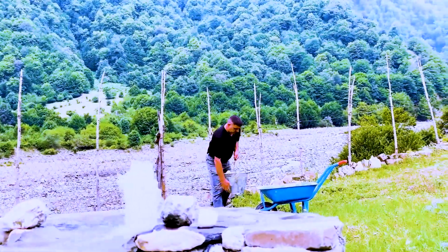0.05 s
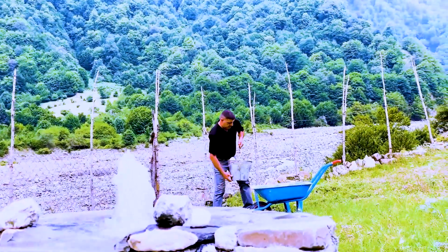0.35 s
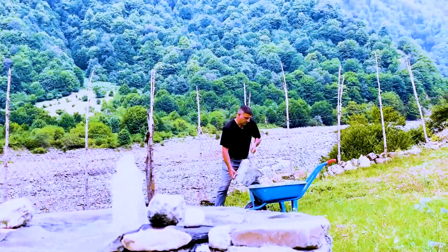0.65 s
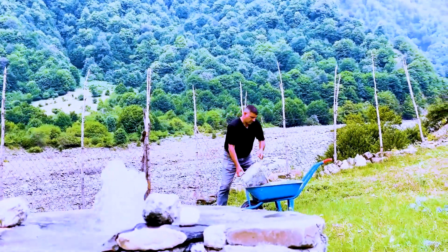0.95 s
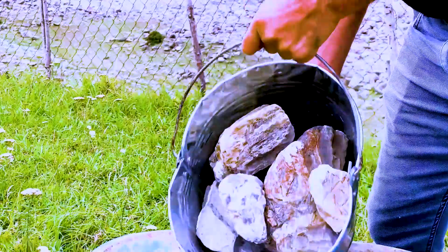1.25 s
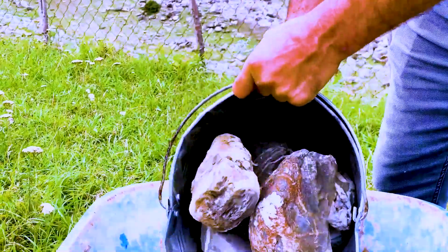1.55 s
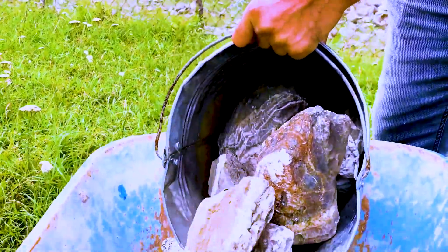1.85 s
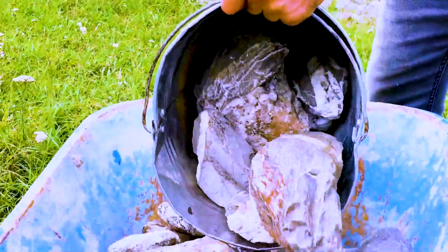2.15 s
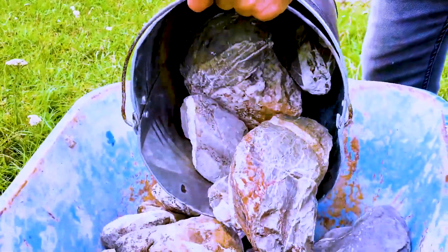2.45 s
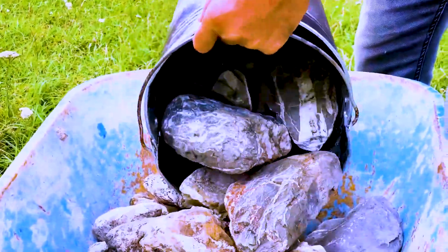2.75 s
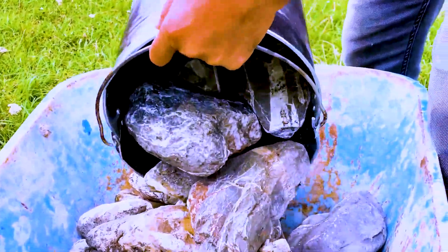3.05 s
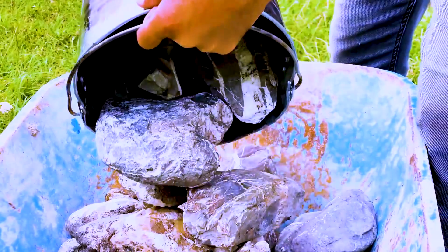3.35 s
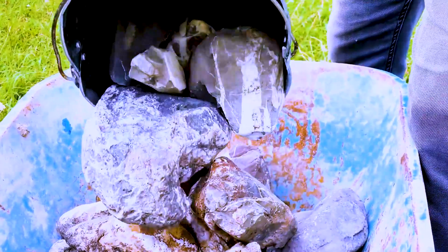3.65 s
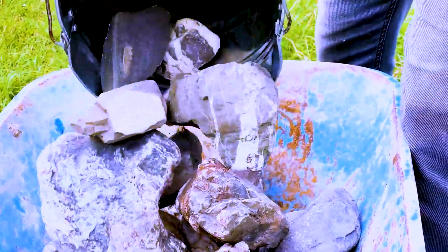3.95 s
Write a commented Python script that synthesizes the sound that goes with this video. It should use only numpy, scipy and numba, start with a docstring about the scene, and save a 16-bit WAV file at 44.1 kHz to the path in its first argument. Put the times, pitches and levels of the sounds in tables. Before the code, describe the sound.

Rocks knock lightly in a metal bucket at first, then tumble with loud, hollow clanks close by from about 1.5 to 2.3 seconds. They scrape out into a wheelbarrow in three gritty slides at about 2.5, 3 and 3.5 seconds, ending on a hard knock. Outdoors behind them, faint falling bird chirps recur roughly every second, with a brief whistle and trill, thin insect hiss and soft air rumble.

```python
"""Rocks tumble from a metal bucket into a wheelbarrow, close by and outdoors.
Their impacts excite the damped modes of the bucket; then they slide out in three pushes, driving
the wall by stick-slip friction while grit hisses under them. Birds chirp, whistle and trill in
frequency-modulated tones, an insect pulses, and air stirs at the microphone.
The recorder's limiter ducks after the hard knocks."""
import sys
import numpy as np
from scipy import signal
from scipy.fft import rfft, irfft
from scipy.io import wavfile
from scipy.ndimage import uniform_filter1d, minimum_filter1d
from numba import njit

SR = 44100
rng = np.random.default_rng(int(sys.argv[2]) if len(sys.argv) > 2 else 0)


def master_out(mix):
    """Clip the mix to full scale and print it as 16-bit PCM to the path in sys.argv[1]."""
    frames = np.transpose(np.atleast_2d(mix))
    ceiling = np.clip(frames, -1, 1)
    pcm = np.round(ceiling * 32767).astype(np.int16)
    wavfile.write(sys.argv[1], SR, pcm)


N = 176400
TIME = np.arange(N) / SR


def undb(db):
    """Amplitude ratio of a level in decibels."""
    return 10 ** (np.asarray(db) / 20)


def unit(x):
    """Normalisation to rms 1."""
    return x / np.sqrt(np.mean(x ** 2) + 1e-18)


def shape(x, gain):
    """Linear filtering: the spectrum is multiplied by gain(f)."""
    n = x.shape[-1]
    return irfft(rfft(x) * gain(np.maximum(np.fft.rfftfreq(n, 1 / SR), 1)), n)


def curve(f, points):
    """Interpolation of (f/Hz, value) points over log frequency."""
    hz, values = np.array(points, float).T
    return np.interp(np.log(f), np.log(hz), values)


def colour(x, points):
    """Zero-phase filtering by (f/Hz, gain/dB) points."""
    return shape(x, lambda f: undb(curve(f, points)))


def walk(rate):
    """Smoothed Gaussian noise, drawn `rate` times a second."""
    k = int(SR / rate)
    steps = np.repeat(rng.standard_normal(N // k + 1), k)
    return 0.84 * uniform_filter1d(uniform_filter1d(steps, k), k)[:N]


def catches(rate, spread_db):
    """Shot noise, as in stick-slip: random impulses whose levels spread exponentially."""
    size = undb(spread_db * np.minimum(rng.exponential(size=N), 4))
    return (rng.random(N) < rate / SR) * size * np.sign(rng.standard_normal(N))


def tone(hz):
    """A sinusoid of rms 1 whose phase is the integral of frequency."""
    return np.sqrt(2) * np.sin(2 * np.pi * np.cumsum(hz) / SR)


def add(out, start, sound):
    """Superposition of a sound from `start` seconds on."""
    i = max(int(start * SR), 0)
    out[i:i + len(sound)] += sound[:max(N - i, 0)]


def pan(db):
    """Intensity stereo: gains for a left-minus-right level difference."""
    return undb(np.array([[db], [-db]]) / 2)


def widen(mid, side, side_gains):
    """Mid-side stereo: a filtered side signal is added left and subtracted right, at constant power."""
    side = colour(side, side_gains)
    return (mid + side * np.array([[1], [-1]])) / np.sqrt(1 + np.var(side) / np.var(mid))


# spectra of the open-air wash and of the rumble of air and handling: f/Hz, level/dB
WASH_SPECTRUM = [(150, -36), (250, -8.5), (576, 2.5), (734, -6), (844, 4), (1130, -6), (1300, -2),
                 (1470, -14), (1660, -7.5), (2700, -14), (4550, -16), (6330, -18), (9450, -18),
                 (10900, -17.5), (11800, -22.5), (15100, -21), (15900, -26)]
RUMBLE_SPECTRUM = [(20, -30), (40, -21), (68, 2.5), (110, -3), (180, -8), (320, -19.5), (700, -54)]
# the wash thins in the middle range once the microphone nears the barrow: f/Hz, gain/dB
NEAR_GAIN = [(200, 12), (1000, -7), (2800, -8), (5000, -3.5), (9000, -0.5)]
# rumble envelope, in two consecutive spans: t/s, level/dB
RUMBLE_ENVELOPE = [
    [(0.0, -25.5), (0.706, -38), (0.9, -30), (0.96, -40.5), (1.158, -35.5), (1.174, -43), (1.45, -28)],
    [(1.45, -35), (1.82, -35), (1.92, -57), (2.07, -36), (2.59, -26.5), (3.96, -32.5), (4.0, -41)],
]
# side relative to mid for wash and rustle: f/Hz, gain/dB
AIR_WIDTH = [(60, -19), (110, -18), (200, -10), (380, -61), (700, -10.5), (1290, 3.5), (2380, -7),
             (4400, -11.5), (8120, -2.5), (15000, -3)]


def air(low_cut_hz=170, near_s=1.29, crossfade_s=0.65):
    """Filtered noise: an outdoor wash, a faint early rustle and an uneven rumble at the microphone."""
    near = np.clip((TIME - near_s) / crossfade_s + .5, 0, 1)
    rustle_spectrum = [(100, -29), (300, 5), (600, -0.5), (2200, -3.5), (3200, -40), (12000, -37)]
    wash, rumble, rustle = [], [], []
    for _ in ("mid", "side"):
        noise = colour(rng.standard_normal(N), WASH_SPECTRUM)
        far = unit(shape(noise, lambda f: 1 / (1 + (low_cut_hz / f) ** 3)))
        wash.append((1 - near) * far + near * colour(far, NEAR_GAIN))
        rumble.append(unit(colour(rng.standard_normal(N), RUMBLE_SPECTRUM)))
        ticks = colour(catches(rate=900, spread_db=4.5), rustle_spectrum)
        rustle.append(unit(ticks * undb(2.2 * walk(14))))
    times, rumble_db = np.vstack(RUMBLE_ENVELOPE).T
    return (undb(-30.5) * widen(*wash, AIR_WIDTH)
            + undb(-41) * (1 - near) * widen(*rustle, AIR_WIDTH)
            + undb(np.interp(TIME, times, rumble_db)) * widen(*rumble, [(40, -28), (150, -50)]))


def insects(pulse_hz=22):
    """Amplitude-modulated narrow-band noise: one bush-cricket pulses over the steady hiss of others."""
    def band(hz, width_hz):
        noise = rng.standard_normal((2, N))
        return unit(shape(noise, lambda f: 1 / (1 + (2 * (f - hz) / width_hz) ** 4)))

    pulse = unit(np.sin(np.pi * pulse_hz * TIME + 0.44 * walk(5.3)) ** 4) * undb(4.5 * walk(2.08))
    cricket = undb(-46) * pulse * band(hz=10990, width_hz=260) * pan(-3)
    return cricket + undb(-44) * band(hz=10820, width_hz=1300)


# modes of the loaded bucket: f/Hz, level/dB, T60/s
BUCKET_MODES = [(192, -12.5, 0.087), (266.5, -5, 0.094), (308, -11, 0.12), (404.8, -4, .11),
                (462.2, 0, 0.09), (544.8, -2.5, 0.13), (592, -9.5, 0.091), (684, -5.5, 0.046),
                (833, -1, 0.074), (931.4, -5.5, 0.13), (1176, -12, 0.064), (1289, -3, 0.056),
                (1376, -21, 0.18), (1492, -17.5, 0.17), (1819, -17, .1)]


def bucket_ring(t, scatter_db=4.5, detune=0.02):
    """Modal superposition: each contact point weights and loads the damped modes differently."""
    hz, db, t60 = np.array(BUCKET_MODES).T[:, :, None]
    weight, load, polarity = rng.standard_normal((3, len(BUCKET_MODES), 1))
    amplitude = np.sign(polarity) * undb(db + scatter_db * weight - 60 * t / t60)
    return np.sum(amplitude * np.sin(2 * np.pi * hz * (1 + detune * load) * t), axis=0)


def split(x, crossover_hz=398):
    """A crossover separates the thump range from the ring range."""
    return [signal.sosfilt(signal.butter(3, crossover_hz, kind, fs=SR, output="sos"), x)
            for kind in ("low", "high")]


# spectra of the stones' dull clatter and of the crack of stone on stone: f/Hz, level/dB
STONE_SPECTRUM = [(25, -45), (60, -38), (130, -9), (260, -5.5), (650, -0.5), (1000, -3.5), (1500, -15),
                  (2100, -22), (3000, -35), (6000, -62.5)]
CRACK_SPECTRUM = [(600, -23), (1500, 7.5), (2400, 0.5), (3500, -7.5), (5000, -6), (10000, -15.5),
                  (16000, -31)]
# blows on bucket and rock: t/s, ring level/dB, thump level/dB, crack level/dB, struck spot f/Hz
IMPACTS = [(0.08, -21, -46, -22.5, 567), (0.473, -27.5, -44, -47, 596), (0.872, -25.5, -33, -44, 613),
           (1.012, -27, -44, -49, 965), (1.324, -29.5, -24.5, -44, 365), (1.445, -20.5, -13, -22, 460),
           (1.514, -8.5, -6, -11.5, 920), (1.553, -5.5, -23, -9, 930), (1.693, 3.5, -1.5, -12, 634),
           (1.778, 2.5, -15, -4.5, 590), (1.841, 3.5, -2, -5.5, 628), (1.929, 1.5, -13, -15, 698),
           (1.983, -4.5, -10, -27, 594), (2.099, -2, -16, -43, 549), (2.151, -7, -15, -34, 540),
           (2.168, 2.5, -10, -14, 685), (2.253, -4, -9, -30, 542), (2.508, -14, -7.5, -30, 437),
           (2.621, -9, -11.5, -18, 491), (2.71, -6, -5, -13, 410), (2.738, -16, -4.5, -14, 420),
           (3.045, -17.5, -12, -39, 590), (3.068, -15, -4, -30, 520), (3.205, -7, -14, -20, 562),
           (3.291, -8.5, -2.5, -28, 402), (3.334, -5.5, -4, -18, 498), (3.547, -19, -22, -39, 476),
           (3.596, -25, -12, -32, 436), (3.672, -13, -14, -44, 917), (3.819, -24, -15, -24.5, 438),
           (3.911, -21, -26, -35, 590), (3.934, -13.5, -6.5, -23, 453), (3.951, -2.5, -1.5, -23, 608)]


def knocks(spot_t60=0.085, clatter_t60=0.16, thump_t60=0.079, crack_t60=0.12, thump_rise_s=0.0043):
    """Impact and free decay: each blow rings the bucket, thumps its load and cracks stone on stone."""
    def strike(x):  # the first 1/60 s gets the power of a unit-amplitude sine
        return x / np.sqrt(2 * np.mean(x[:SR // 60] ** 2))

    t, out = TIME[:SR // 4], np.zeros(N)
    for start, ring_db, thump_db, crack_db, spot_hz in IMPACTS:
        wall_low, wall_high = split(bucket_ring(t))
        dull, clatter = split(colour(rng.standard_normal(len(t)), STONE_SPECTRUM))
        spot = np.sin(2 * np.pi * spot_hz * t) * undb(5.5 - 60 * t / spot_t60)
        ring = spot + strike(wall_high) + strike(clatter * undb(-60 * t / clatter_t60))
        thump = strike(wall_low) + strike(dull * undb(-60 * t / thump_t60))
        thump *= 1 - np.exp(-t / thump_rise_s)
        crack = colour(rng.standard_normal(len(t)), CRACK_SPECTRUM)
        crack = shape(crack, lambda f: 1 / np.hypot(1, f / 6000)) * undb(-60 * t / crack_t60)
        body = undb(ring_db) * strike(ring) + undb(thump_db) * strike(thump)
        add(out, start, body + undb(crack_db) * strike(crack) / 2)
    return out


# falling chirps: t/s, top f/Hz, level/dB, hold before the fall/s
FALLING_CHIRPS = [(0.095, 6100, -32.5, 0.0036), (0.2, 5620, -34, .003), (0.296, 5560, -36, 0.0053),
                  (1.061, 6350, -30, 0.023), (1.157, 5730, -32, 0.0033), (1.25, 5620, -31.5, .005),
                  (2.26, 6230, -29, 0.023), (2.357, 5810, -27.5, 0.0044), (2.45, 5640, -29.5, .005),
                  (2.546, 5470, -29, .003), (3.365, 6200, -28, 0.0095), (3.467, 5520, -32.5, 0.0046)]
# soft notes before two of the runs: t/s, level/dB
LEAD_IN_NOTES = [(0.943, -34), (2.14, -34)]


def chirps(fall_s=0.04, bend_s=0.014, bend_hz=4590, end_hz=3430, lead_in_s=0.039, echo_t60=0.27):
    """Frequency sweeps: a bird's notes hold their top and plunge; the trees scatter a faint echo."""
    out, held = np.zeros(N), undb(-5)
    for start, top_hz, db, hold in FALLING_CHIRPS:
        t = np.arange(-hold - .003, fall_s, 1 / SR)
        sweep = np.interp(t, [.001, bend_s, fall_s], [top_hz, bend_hz, end_hz])
        hz = uniform_filter1d(sweep, SR // 200) * (1 + 0.016 * walk(460)[:len(t)])
        envelope = np.interp(t, [t[0], t[0] + 0.0044, 0, fall_s / 3, fall_s], [0, held, held, 1.2, 0])
        add(out, start + t[0], undb(db) * envelope * (tone(hz) + undb(-18) * tone(2 * hz)))
    n = int(lead_in_s * SR)
    for start, db in LEAD_IN_NOTES:
        add(out, start, undb(db) * np.hanning(n) * tone(np.linspace(4960, 4250, n)))
    t = TIME[:SR // 2]
    trees = unit(rng.standard_normal((2, len(t))) * undb(-60 * t / echo_t60)) / np.sqrt(len(t))
    echo = signal.fftconvolve(out[None], trees, axes=1)[:, :N]
    return out * pan(7) + undb(-5.5) * echo


# envelopes as the rocks shift, then slide three times: t/s, relative bass, middle and grit level/dB
SHIFT_ENVELOPE = [(1.42, -34.5, -41, -63), (1.556, -20.5, -12, -28.5), (1.656, -22, -21.5, -47),
                  (1.682, -24, -23, -35.5), (1.708, -12, -18, -58), (1.848, -19.5, -7.5, -34),
                  (1.854, -16, -12, -59), (2.006, -29, -16, -45), (2.074, -18.5, -15, -35),
                  (2.116, -18.5, -29, -64), (2.17, -26, -15.5, -39), (2.182, -13, -7, -41.5),
                  (2.47, -26.5, -32, -46.5)]
SLIDE_ENVELOPES = [
    [(2.47, -45, -37, -50), (2.5, -20, -24, -37), (2.522, -10, -16, -49), (2.56, -15, -15.5, -33.5),
     (2.614, -14, -12, -36), (2.622, -14, -14.5, -29), (2.746, -11.5, -7.5, -36), (2.8, -9, -10, -36.5),
     (2.876, -25.5, -29, -52), (2.93, -26.5, -42, -50)],
    [(2.93, -25, -51, -58), (2.95, -21.5, -42, -70), (3.018, -20.5, -28.5, -68), (3.078, -19, -12.5, -50),
     (3.118, -18.5, -26, -48), (3.216, -12.5, -13.5, -28), (3.262, -11.5, -9.5, -38),
     (3.342, -18, -6.5, -36), (3.412, -15.5, -31, -54), (3.46, -28, -55, -57)],
    [(3.46, -32, -50, -62), (3.474, -27.5, -44, -66), (3.604, -18.5, -22, -40), (3.62, -19.5, -24, -64),
     (3.744, -14.5, -21.5, -40.5), (3.888, -24.5, -24.5, -65), (3.948, -11, -18, -48),
     (3.956, -15, -26, -64), (3.964, -16, -5, -42), (4.0, -7, -17, -49)],
]
# spectrum of the grit between the stones: f/Hz, level/dB
GRIT_SPECTRUM = [(700, -33), (1800, 10.5), (2400, 2), (3200, -0.5), (4600, 2), (7000, -2), (10000, -2.5),
                 (12000, -12), (16000, -14)]


def scraping(rock_count=4, catches_per_s=650, spread_db=3, shift_boost_db=4):
    """Stick-slip friction: rocks catch and slip on the bucket wall, crushing grit beneath them."""
    def steady(x):  # running rms held at 1
        return x / np.sqrt(uniform_filter1d(x ** 2, SR // 12) + 1e-12)

    shift = np.array(SHIFT_ENVELOPE) + [0, shift_boost_db, shift_boost_db, 0]
    times, *levels = np.vstack([shift, *SLIDE_ENVELOPES]).T
    bass, middle, hiss = (undb(np.interp(TIME, times, db, left=-90)) for db in levels)
    wall = np.zeros(N)
    for _ in range(rock_count):
        force = catches(catches_per_s / rock_count, spread_db)
        wall += signal.fftconvolve(force, bucket_ring(TIME[:SR // 4], detune=0.047))[:N]
    stones = colour(catches(catches_per_s, spread_db), STONE_SPECTRUM)
    low, high = map(steady, split(unit(wall) + undb(-5) * unit(stones)))
    grit = unit(colour(catches(rate=7000, spread_db=0), GRIT_SPECTRUM)) * undb(2 * walk(60))
    return undb(-1) * bass * low + undb(-2.5) * middle * high + undb(5.5) * hiss * grit


# single resonances of the wall: t/s, duration/s, f/Hz, level/dB
WALL_GROANS = [(2.203, 0.23, 560, -18), (2.48, .1, 435.4, -14.5), (2.679, 0.12, 264.3, -12),
               (3.251, 0.12, 401, -20), (3.7, 0.13, 252.5, -18)]


def groans(wander_hz=35):
    """Friction-driven resonance: the wall hums hollowly while a heavy rock drags over it."""
    out = np.zeros(N)
    for start, length, hz, db in WALL_GROANS:
        n = int(length * SR)
        hum = tone(hz + wander_hz * walk(149.4)[:n]) * undb(3.9 * walk(90)[:n])
        add(out, start, undb(db) * np.hanning(n) * hum)
    return out


# side relative to mid, and left minus right: f/Hz, level/dB
ROCK_WIDTH = [(80, -10), (300, -15), (550, -27), (750, -17.5), (1300, -8), (2200, -11.5), (6000, -12.5),
              (12000, -10)]
ROCK_LEVEL_DIFFERENCE = [(300, 0), (650, 0), (850, 4), (1100, -1.8), (1350, 9.5), (1650, 2), (5000, -1),
                         (10000, -0.5)]
# lead of the left channel: f/Hz, phase/rad
ROCK_PHASE_LEAD = [(100, 1), (250, 0.1), (550, 0.27), (700, 0.71), (1200, 0.59), (1550, 0), (2000, 0.12),
                   (9000, 0.44)]


def rocks():
    """Level and phase differences between the channels place the rocks a little to the left."""
    def lean(f):
        return undb(curve(f, ROCK_LEVEL_DIFFERENCE) / 2) * np.exp(1j * curve(f, ROCK_PHASE_LEAD) / 2)

    mid = knocks() + scraping() + groans()
    side = knocks() + scraping()  # fresh random draws decorrelate it from the mid
    left, right = widen(mid, side, ROCK_WIDTH)
    return np.array([shape(left, lean), shape(right, lambda f: 1 / lean(f))])


# contour of a second bird's note: t/s, f/Hz, level/dB
WHISTLE_CONTOUR = [(2.44, 3470, -33), (2.458, 3523, -25.5), (2.502, 3504, -22), (2.576, 3397, -26),
                   (2.59, 3400, -32)]


def whistle(fade_s=0.0074):
    """A nearly pure tone: one whistled note whose frequency sags at its end."""
    times, hz, db = np.array(WHISTLE_CONTOUR).T
    envelope = undb(np.interp(TIME, times, db, left=-120, right=-120))
    pitch = np.interp(TIME, times, hz) * (1 + 0.0013 * walk(80))
    return uniform_filter1d(envelope, int(fade_s * SR)) * tone(pitch) * pan(-5)


# notes of one trill figure: offset t/s, start f/Hz, end f/Hz, duration/s, level/dB
TRILL_FIGURE = [(0, 6900, 6820, .028, -38), (-.003, 9300, 9200, .026, -41), (-.021, 7900, 10200, .011, -40),
                (-.016, 8150, 8200, .012, -41)]


def trill(start_s=2.782, period_s=0.0437, repeats=7, edge_db=-5):
    """Periodic repetition: a figure of thin, high glides recurs quickly, swelling and fading."""
    out = np.zeros(N)
    for k, edge in enumerate(np.linspace(-1, 1, repeats)):
        for offset, from_hz, to_hz, length, db in TRILL_FIGURE:
            n = int(length * SR)
            glide = tone(np.linspace(from_hz, to_hz, n) + 20 * walk(660)[:n])
            envelope = undb(db + edge_db * edge ** 2) * np.hanning(n)
            add(out, start_s + k * period_s + offset, envelope * glide)
    return out


def scene():
    """Superposition of the sources: rocks in front, wildlife and air around."""
    return rocks() + chirps() + whistle() + trill() + insects() + air()


@njit
def follow(peak, fall):
    """Peak detection: instant rise, exponential release towards 1."""
    out, envelope = np.empty(len(peak)), 1.
    for i in range(len(peak)):
        envelope = max(peak[i], 1 + (envelope - 1) * fall)
        out[i] = envelope
    return out


def record(dry, low_cut_hz=38, limit_db=0.5, release_s=0.081, lookahead_s=0.0026, top_hz=15900):
    """Band and peak limiting: a low cut, a look-ahead limiter, then the recorder's treble cut-off."""
    dry = signal.sosfilt(signal.butter(3, low_cut_hz, "high", fs=SR, output="sos"), dry)
    peak = np.abs(dry).max(axis=0) / undb(limit_db)
    gain = 1 / follow(peak, np.exp(-1 / (release_s * SR)))
    n = int(lookahead_s * SR)
    gain = uniform_filter1d(minimum_filter1d(gain, n), n)
    return signal.sosfilt(signal.ellip(10, .1, 80, top_hz, fs=SR, output="sos"), dry * gain)


dry = scene()
out = record(dry)
master_out(out)
```